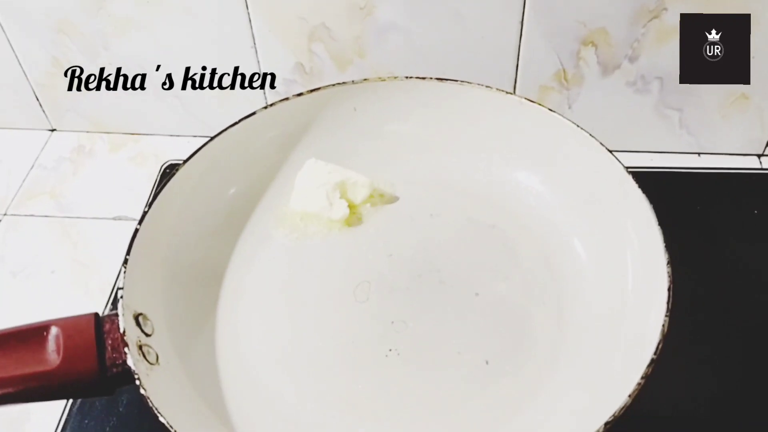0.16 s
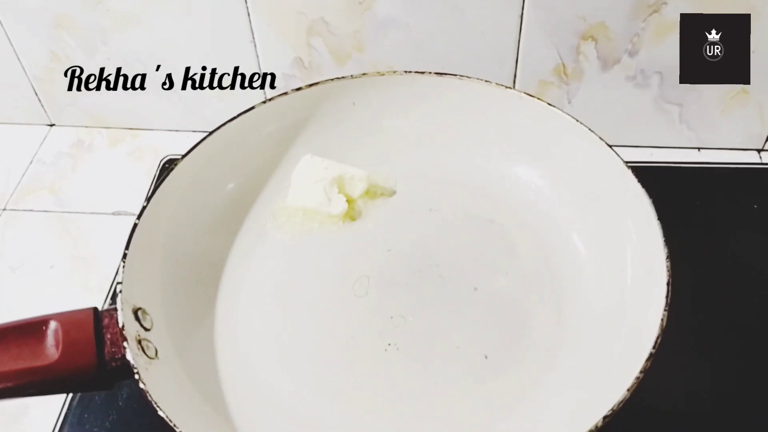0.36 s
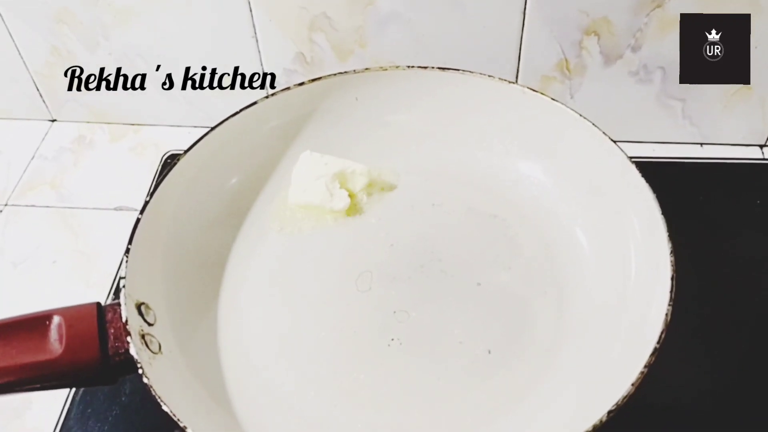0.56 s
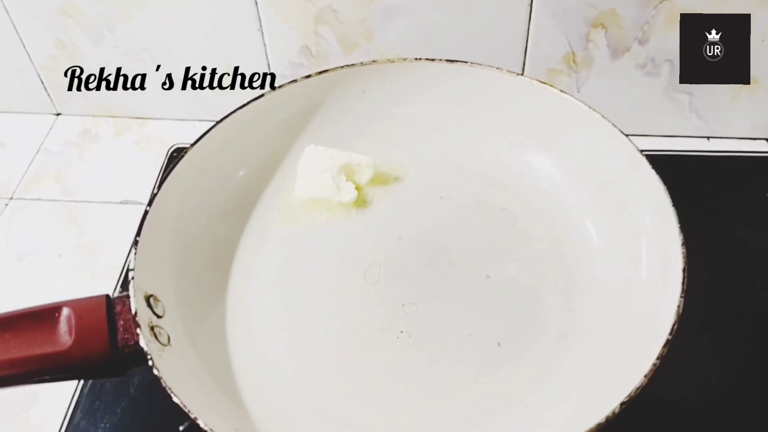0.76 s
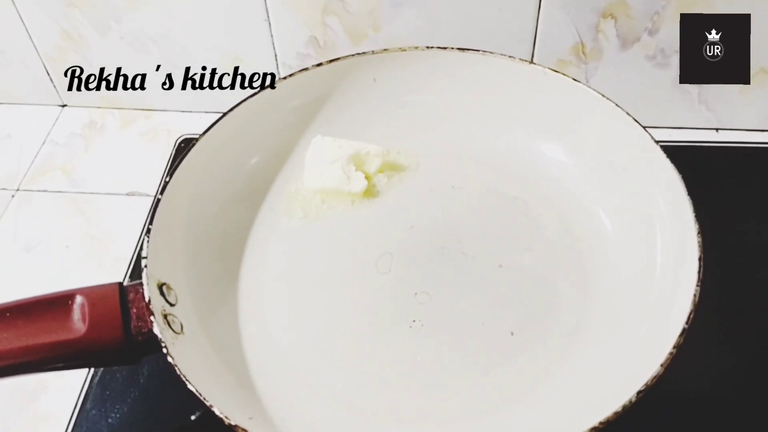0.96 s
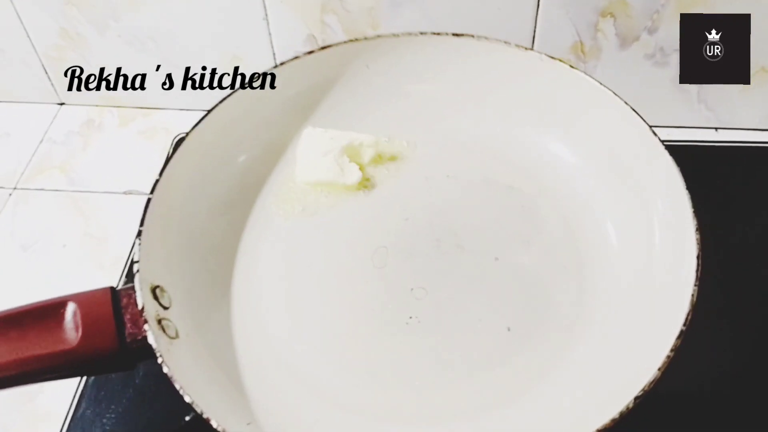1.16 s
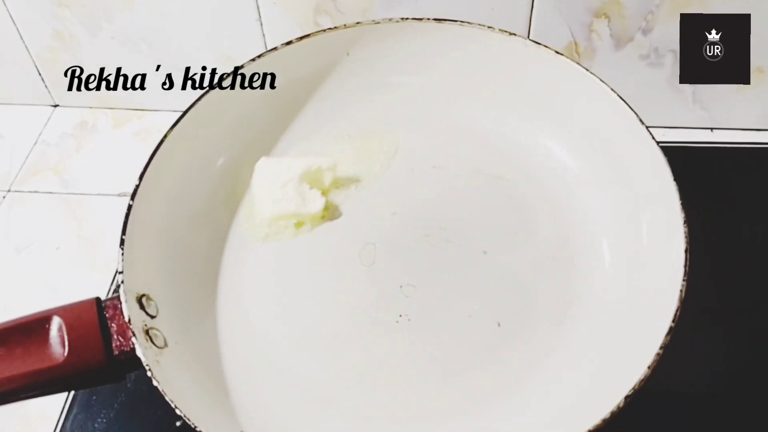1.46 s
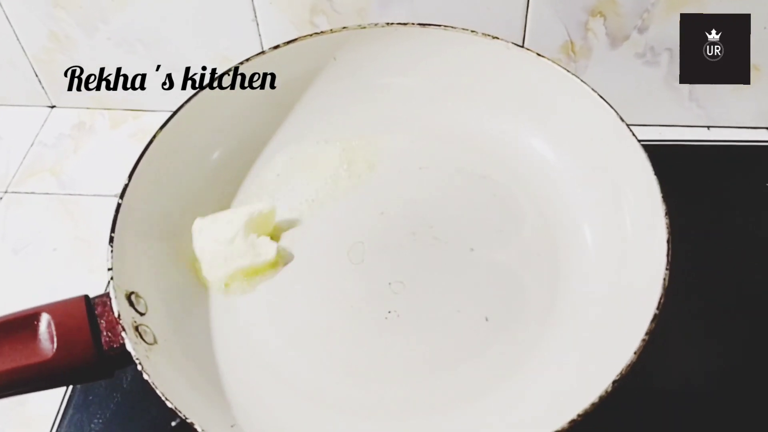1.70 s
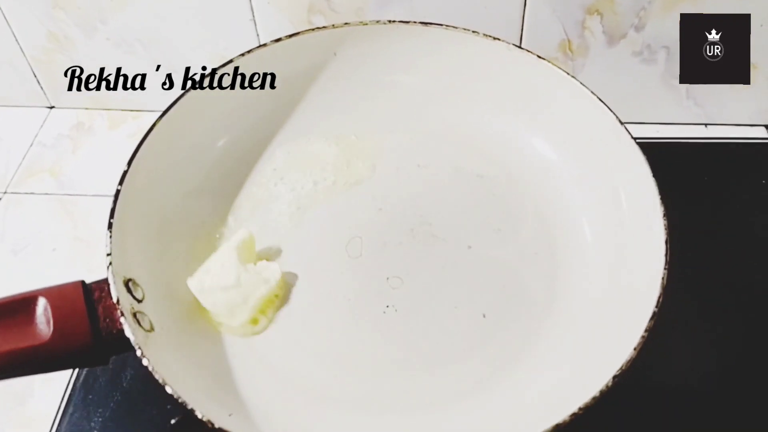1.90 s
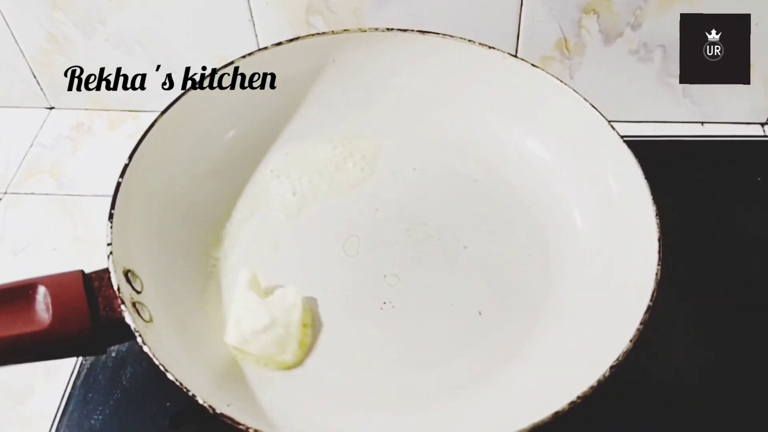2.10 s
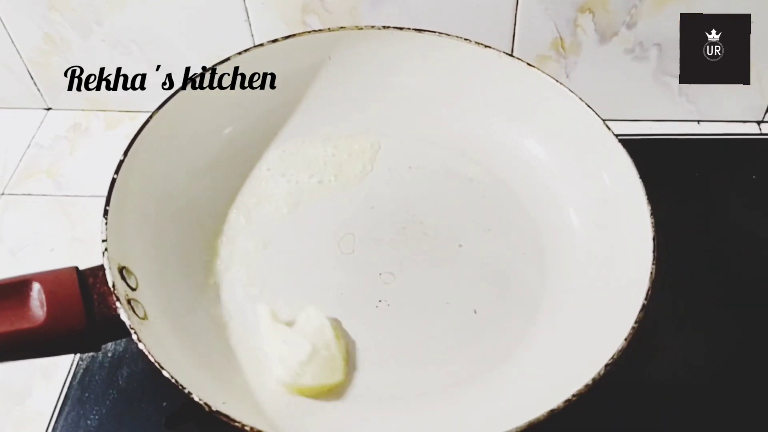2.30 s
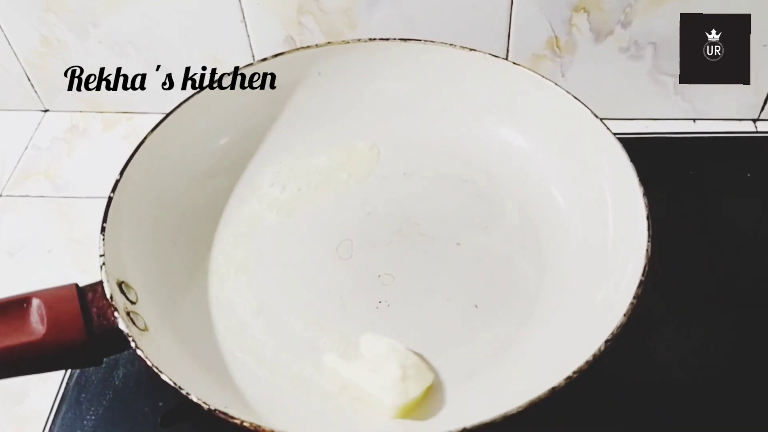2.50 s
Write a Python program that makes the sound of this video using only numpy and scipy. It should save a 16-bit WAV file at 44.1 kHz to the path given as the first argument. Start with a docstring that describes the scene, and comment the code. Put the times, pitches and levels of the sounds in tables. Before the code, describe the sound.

Butter frying in a hot pan, heard close up in stereo in a hard kitchen: a fine hiss with small crackles, a soft thump, a sharp spit and light tap, then louder sizzling and a ringing knock.

```python
"""In a hard, ringing kitchen, butter fries in a hot pan close to a two-port microphone.
Steam bursts in the fat: shaped noise for the hiss, damped sines for bubbles, sharp noise bursts for spits.
The sizzle is harder once the pan tilts and the butter slides onto fresh metal. It leans to the left port in
level above the bass, but crackle, pops and spits reach the right port earlier. The pan thumps, taps and knocks
as struck resonances; brief bands of noise swell like rubbing, and filtered noise makes a low room hum."""
import sys
import numpy as np
from scipy import signal
from scipy.fft import rfft, irfft, next_fast_len
from scipy.io import wavfile
from scipy.ndimage import uniform_filter1d, map_coordinates

SR = 44100
rng = np.random.default_rng(int(sys.argv[2]) if len(sys.argv) > 2 else 0)


def master_out(mix):
    """Clip the mix to full scale and print it as 16-bit PCM to the path in sys.argv[1]."""
    frames = np.transpose(np.atleast_2d(mix))
    ceiling = np.clip(frames, -1, 1)
    pcm = np.round(ceiling * 32767).astype(np.int16)
    wavfile.write(sys.argv[1], SR, pcm)


N = 116865
SECONDS = np.arange(N) / SR
LAG_S = 0.00024  # mean delay of the left port behind the right, for crackle, pops and spits


def amp(db):
    """Decibel law: level in dB to amplitude ratio."""
    return 10 ** (np.asarray(db) / 20)


def unit(x):
    """Normalisation to an rms of 1."""
    return x / np.sqrt(np.mean(x ** 2) + 1e-20)


def along(points, hz):
    """Interpolation of (Hz, value) points on a logarithmic frequency axis."""
    f, v = np.transpose(points)
    return np.interp(np.log(hz + 1), np.log(f + 1), v, left=v[0], right=v[-1])


def filtered(x, response):
    """Linear filtering: the spectrum of x times a complex response of frequency."""
    m = next_fast_len(N + SR)
    return irfft(rfft(x, m) * response(np.fft.rfftfreq(m, 1 / SR)), m)[..., :N]


def wobble(knots_per_s):
    """Random modulation: a smooth curve through random knots."""
    knots = rng.standard_normal(int(N * knots_per_s / SR) + 4)
    return map_coordinates(knots, [np.arange(N) * knots_per_s / SR])


def paired(pair, alike):
    """Interaural coherence: mixes two unrelated signals into left and right of the given likeness."""
    def mid_and_side(hz):
        turn = np.arccos(np.clip(along(alike, hz), -1, 1)) / 2
        return np.array([np.cos(turn), np.sin(turn)])

    mid, side = filtered(pair, mid_and_side)
    return np.array([mid + side, mid - side])


def rush(spectrum, patchy_db, size=(7, 8)):
    """Spectral shaping of noise: two noises share patches of random gain, size (bins, frames); rms 1."""
    z = signal.stft(rng.standard_normal((2, N)), nperseg=512)[2]
    field = uniform_filter1d(rng.standard_normal(z.shape[1:]), size=size[0], axis=0)
    field = uniform_filter1d(field, size=size[1], axis=1)
    pair = signal.istft(z * amp(patchy_db * unit(field)), nperseg=512)[1][:, :N]
    return unit(filtered(pair, lambda hz: amp(along(spectrum, hz))))


def bubbles(s, db, hz, pan_db, lag_s, cycles):
    """Damped oscillation: sines with a soft start, each with its own side and lag."""
    out, k = np.zeros((2, N + 400)), np.arange(128)
    for side, sign in enumerate((1, -1)):
        start = (s + sign * lag_s / 2) * SR
        turns = np.maximum((k - start[:, None] % 1) * hz[:, None] / SR, 0)
        u = turns * np.e / cycles  # the envelope peaks at u = 1
        peak = amp(db + sign * pan_db / 2)[:, None]
        wave = peak * u * np.exp(1 - u) * np.sin(2 * np.pi * turns)
        places = np.clip(start, 0, N).astype(int)[:, None] + k
        out[side] = np.bincount(places.ravel(), wave.ravel(), N + 400)
    return out[:, :N]


# Decay of the room. Each row: frequency in Hz, reverberation time (60 dB fall) in s.
ROOM_DECAY = [(150, 0.56), (400, 0.83), (1000, 0.62), (3000, 0.79), (10000, 0.33)]
# Diffuseness of the room. Each row: frequency in Hz, left-right likeness (1 is identical).
ROOM_LIKENESS = [(100, 0.99), (300, 1), (600, 0.57), (1200, 0.056), (9000, 0.038)]


def kitchen(x):
    """Reverberation: a fresh noise tail in which each frequency dies at its own speed."""
    hz, t, z = signal.stft(rng.standard_normal((2, SR)), SR, nperseg=256)
    fall = amp(-60 * t / along(ROOM_DECAY, hz)[:, None])
    tail = signal.istft(z * fall, SR, nperseg=256)[1]
    delayed = np.pad(np.atleast_2d(x), ((0, 0), (130, 0)))  # 130 samples before the tail begins
    wet = signal.fftconvolve(delayed, tail / np.linalg.norm(tail[0]), axes=1)
    return paired(wet[:, :N], ROOM_LIKENESS)


# Course of the frying. Each row: time in s, then the level in dB, before the port balance, of the
# middle band, of the top band and of the low hiss.
FRY_LEVELS = [(0, -49.5, -46, -69), (.1, -53, -53.5, -66.5), (.25, -53.5, -54.5, -69),
              (.34, -52, -47.5, -73), (.42, -48.5, -52, -65), (.49, -53.5, -52, -71),
              (.57, -51, -54, -63.5), (.64, -49, -48.5, -65.5), (.77, -48, -57.5, -66.5),
              (.84, -52.5, -46.5, -64.5), (.92, -51, -51.5, -54), (1.02, -50, -49, -61),
              (1.1, -48, -46.5, -51), (1.22, -50.5, -51, -60.5), (1.28, -46.5, -48, -63),
              (1.35, -47.5, -49.5, -63), (1.46, -47, -43, -50), (1.6, -47.5, -38.5, -48),
              (1.7, -39, -37.5, -47), (1.85, -40.5, -38, -50), (2, -43, -36, -49.5),
              (2.08, -39, -34.5, -45.5), (2.18, -42.5, -36, -50), (2.36, -39.5, -36, -47),
              (2.52, -42.5, -41, -51), (2.65, -47, -35, -54)]
# Colour of the hiss. Each row: frequency in Hz, relative level in dB.
HISS_SPECTRUM = [(600, -48), (1500, -17), (2100, -16), (2700, -8), (4000, -3), (5800, -2), (8500, -3),
                 (11000, -6.5), (14000, -3), (15400, -5.5)]
# Balance of the ports. Each row: frequency in Hz, left over right in dB.
PORT_BALANCE = [(300, -5), (1000, 3), (3000, 2), (8000, 3.5), (14000, 7)]
LOW_SPLIT_HZ, SPLIT_HZ = 3600, 9000  # edges of the three bands
HISS_DB, CRACKLE_DB, PATCHY_DB = -1, -6.5, 1  # relative levels; unevenness of the hiss
FLUTTER_DB, FLUTTER_PER_S = .7, 45
BUBBLES_PER_S, SIZE_DB, RAREST = 2000, 3.8, .02  # RAREST caps the size of the biggest
BUBBLE_HZ, BUBBLE_SPREAD, BUBBLE_CYCLES = 9500, .3, 4  # spread in natural-log pitch
LAG_SPREAD_S, SIDE_SPREAD_DB = .0001, -0.5
BRIGHT_HZ, BRIGHT_WIDTH_HZ, BRIGHT_DB = 7310, 470, 5  # a steady bright band in the sizzle


def crackling():
    """Random superposition: tiny bubbles at random times, mostly weak and a few strong."""
    draw = rng.random((int(BUBBLES_PER_S * N / SR), 2))
    odd = rng.standard_normal((len(draw), 3))
    start_s = draw[:, 0] * N / SR
    level_db = -SIZE_DB * np.log(draw[:, 1] + RAREST)
    hz = np.clip(BUBBLE_HZ * np.exp(BUBBLE_SPREAD * odd[:, 0]), 5000, 16000)
    pan_db = SIDE_SPREAD_DB * odd[:, 1]
    lag_s = LAG_S + LAG_SPREAD_S * odd[:, 2]
    return bubbles(start_s, level_db, hz, pan_db, lag_s, BUBBLE_CYCLES)


def frying():
    """Incoherent summation: countless tiny bubbles merge to hiss; nearer ones crackle on top."""
    flutter_db = FLUTTER_DB * wobble(FLUTTER_PER_S)
    hiss = amp(HISS_DB + flutter_db) * rush(HISS_SPECTRUM, PATCHY_DB)
    mix = hiss + amp(CRACKLE_DB) * unit(crackling())
    mix = filtered(mix, lambda hz: amp(BRIGHT_DB * np.exp(-.5 * ((hz - BRIGHT_HZ) / BRIGHT_WIDTH_HZ) ** 2)))

    def over(hz, edge):
        return 1 / (1 + (edge / (hz + 1)) ** 8)

    bands = [lambda hz: over(hz, LOW_SPLIT_HZ) - over(hz, SPLIT_HZ),
             lambda hz: over(hz, SPLIT_HZ),
             lambda hz: 1 - over(hz, LOW_SPLIT_HZ)]
    s, *levels_db = np.transpose(FRY_LEVELS)
    both = np.zeros((2, N))
    for db, band in zip(levels_db, bands):
        both += amp(np.interp(SECONDS, s, db)) * unit(filtered(mix, band))
    return filtered(both, lambda hz: amp(np.outer([.5, -.5], along(PORT_BALANCE, hz))))


# Colour of the murmur. Each row: frequency in Hz, relative level in dB.
HUM_SPECTRUM = [(15, -55), (25, -26), (69, -9), (142, 2.5), (172, -5), (350, -8.5), (450, -3), (601, -17),
                (918, -5.5), (2020, -24.5), (2500, -51), (3250, -66), (5000, -84)]
# Course of the murmur. Each row: time in s, level in dB.
HUM_COURSE = [(0, -68), (.3, -66), (.5, -64.5), (.68, -68), (.88, -63), (1.1, -65.5), (1.45, -65),
              (1.7, -66), (1.85, -63), (1.97, -66.5), (2.15, -58.5), (2.45, -67.5), (2.65, -63)]
HUM_PATCHY_DB = 2.5


def hum():
    """Band-shaped random noise: the low murmur of the room, wavering in level and colour."""
    murmur = rush(HUM_SPECTRUM, HUM_PATCHY_DB, size=(2, 22))
    level = amp(np.interp(SECONDS, *np.transpose(HUM_COURSE)))
    return level * paired(murmur, ROOM_LIKENESS)


# Big single bubbles. Each row: time in s (the wave starts POP_DELAY_S later), envelope peak in dB
# midway between the ports, pitch in Hz, left over right in dB.
POP_EVENTS = [(.3245, -29, 6900, 6), (.408, -29, 13400, 8), (.5608, -32, 6450, 8), (.7128, -29, 8800, 9),
              (.7205, -35, 7600, 8), (.758, -33, 7000, 8), (.7617, -33, 9500, 6), (.857, -37, 7860, 6),
              (.884, -37, 4900, 5), (.9103, -35, 6520, 6), (.949, -36, 7750, 6), (.9634, -29, 7680, 10),
              (1.013, -32, 7250, 7), (1.118, -33, 7260, 5), (1.177, -33, 7100, 6), (1.2597, -30, 6900, 7),
              (1.265, -33, 6500, 6), (1.317, -29, 6700, 5), (1.377, -32, 7600, 4), (1.391, -32, 6700, 5),
              (1.4433, -32, 7700, 4), (1.528, -31, 7500, 5), (1.5715, -30, 7050, 4), (1.954, -26, 7480, 5),
              (2.0115, -27, 7200, 7), (2.152, -27, 7450, 5), (2.168, -26, 7340, 4), (2.269, -27, 7200, 5),
              (2.39, -25, 7450, 7)]
POP_DELAY_S, POP_CYCLES = 0.000883, 6


def pops():
    """Damped oscillation: single big bubbles, each a brief pitched ring."""
    s, db, hz, pan_db = np.transpose(POP_EVENTS)
    return bubbles(s + POP_DELAY_S, db, hz, pan_db, np.full(len(s), LAG_S), POP_CYCLES)


# Bands of noise. Each row: start in s, length in s, level in dB at full swell.
# The one at 2.008 s is a soft noise swell around the knock's onset.
SWELL_EVENTS = [(0.33, 0.15, -60), (0.558, 0.041, -63), (0.888, 0.057, -89), (1.314, 0.13, -64.5),
                (1.517, 0.25, -58.5), (2.008, 0.094, -36.5), (2.19, 0.093, -60), (2.276, 0.313, -63)]
# Colour of the swells. Each row: frequency in Hz, relative level in dB.
SWELL_SPECTRUM = [(100, -59), (250, -16), (500, -3), (950, 4.5), (1400, -10.5), (1900, -3.5), (2600, 1.5),
                  (5000, -62)]
SWELL_PATCHY_DB, SWELL_RAMP_S = 2, 0.026


def noise_swells():
    """Amplitude modulation of banded noise: soft swells that rise and fall in straight ramps."""
    swell = np.zeros(N)
    for s, length, db in SWELL_EVENTS:
        to_nearest_end = np.minimum(SECONDS - s, s + length - SECONDS)
        swell += amp(db) * np.clip(to_nearest_end / SWELL_RAMP_S, 0, 1)
    return swell * paired(rush(SWELL_SPECTRUM, SWELL_PATCHY_DB, size=(2, 14)), ROOM_LIKENESS)


BROAD_DB, WIDEN, THIN_HZ = -9.5, 0.59, 172  # unresonant share; factor on all widths; bass-cut corner
DIRECT_DB, PAN_LAG_S = -3, .0001  # direct sound; left behind right


def blows(events, body, wet_db):
    """Modal resonance: short soft blows ring a body, heard directly and through the kitchen."""
    push = np.zeros(N)
    for s, db, soft_hz in events:
        blow = np.zeros(N)
        blow[round(s * SR)] = amp(db)
        push += filtered(blow, lambda f: SR / soft_hz / (1 + 1j * f / soft_hz) ** 3)

    def ring(f):
        total = amp(BROAD_DB)
        for k, (centre, width, db) in enumerate(body):
            damping = 1j * f * width * WIDEN
            total = total + (-1) ** k * amp(db) * damping / (centre * centre - f * f + damping)
        return (1j * f / (THIN_HZ + 1j * f)) ** 2 * total

    dry = filtered(push, ring)
    lagged = filtered(dry, lambda f: np.exp(-1j * np.pi * PAN_LAG_S * np.outer([1, -1], f)))
    return amp(DIRECT_DB) * lagged + amp(wet_db) * kitchen(dry)


# Blows of the thump. Each row: time in s, relative strength in dB, softness low-pass in Hz.
THUMP_BLOWS = [(1.045, -29.5, 470), (1.0535, -25.5, 2140), (1.0585, -21, 1720), (1.077, -32.5, 2000)]
# Resonances of the thump. Each row: centre in Hz, width in Hz before WIDEN, relative level in dB.
THUMP_MODES = [(202, 30, 0), (294.5, 10.6, 13), (331, 17, 11), (452, 23, 6), (521, 18.5, 12),
               (700, 110, 1.5), (947, 270, 3), (1303, 110, 13), (1910, 110, 5.5)]


def thumps():
    """Impact excitation: a cluster of soft blows thumps the pan."""
    return blows(THUMP_BLOWS, THUMP_MODES, wet_db=-3)


# Broad sharp spits. Each row: time in s, relative strength in dB midway between the ports.
SPIT_EVENTS = [(1.6386, -19), (1.6447, 6)]
# Colour of a spit. Each row: frequency in Hz, relative level in dB.
SPIT_SPECTRUM = [(200, -44), (1000, -26), (2500, -23), (5500, -17), (7500, -3), (12000, 0), (16000, -3)]
SPIT_T60, SPIT_FRAY_DB = .0015, -8  # the short noise (s, dB against the crack)
SPLASH_T60, SPLASH_DB = .014, -21  # the longer noise behind it (s, dB against the crack)
SPIT_LEFT_DB = 5  # left over right


def spits():
    """Impulsive radiation: a sharp crack with a short noisy splash behind it."""
    spit, t = np.zeros((2, N)), np.arange(1500) / SR
    decay = amp(SPIT_FRAY_DB - 60 * t / SPIT_T60) + amp(SPLASH_DB - 60 * t / SPLASH_T60)
    for s, db in SPIT_EVENTS:
        burst = decay * rng.standard_normal((2, len(t)))
        burst[:, 0] = -1  # the crack, alike in both ports
        for side, sign in enumerate((1, -1)):
            start = round((s + sign * LAG_S / 2) * SR)
            spit[side, start:][:len(t)] += amp(db + SPIT_LEFT_DB / 2 * sign) * burst[side]
    return filtered(spit, lambda hz: amp(along(SPIT_SPECTRUM, hz)))


# Blow of the tap. Each row: time in s, relative strength in dB, softness low-pass in Hz.
TAP_BLOWS = [(1.7425, -28.5, 2140)]
# Resonances of the tap. Each row: centre in Hz, width in Hz before WIDEN, relative level in dB.
TAP_MODES = [(472, 27, 2.5), (587, 200, 5), (874, 200, 11), (1070, 84, 14), (1400, 360, 3)]


def taps():
    """Impact excitation: one light blow taps the pan."""
    return blows(TAP_BLOWS, TAP_MODES, wet_db=-4)


# Blows of the knock. Each row: time in s, relative strength in dB, softness low-pass in Hz.
KNOCK_BLOWS = [(2.0355, -10, 6000), (2.042, -23, 9000), (2.055, -20, 2500), (2.0715, -28, 9000)]
# Resonances of the knock. Each row: centre in Hz, width in Hz before WIDEN, relative level in dB.
KNOCK_MODES = [(184, 28, -1), (300, 60, 2.5), (556, 165, 6.5), (645, 61, 12.5), (1026, 215, 7),
               (1192, 64, 14), (1517, 340, 6.5), (2333, 20, 14.5), (2780, 26, 8), (4030, 210, 8),
               (4780, 1100, 3.5), (6440, 350, 15.5)]


def knocks():
    """Impact excitation: harder blows knock the pan and ring its higher modes too."""
    return blows(KNOCK_BLOWS, KNOCK_MODES, wet_db=-2)


FRY_WET_DB = -13  # the kitchen's answer to pops and spits


def scene():
    """Superposition: all sources add at the microphone."""
    near = pops() + spits()
    pan = thumps() + taps() + knocks()
    return frying() + hum() + near + amp(FRY_WET_DB) * kitchen(near) + noise_swells() + pan


TOP_HZ = 15560


def record(dry):
    """Band limiting: nothing passes at or above TOP_HZ."""
    return filtered(dry, lambda hz: hz < TOP_HZ)


dry = scene()
out = record(dry)
master_out(out)
```